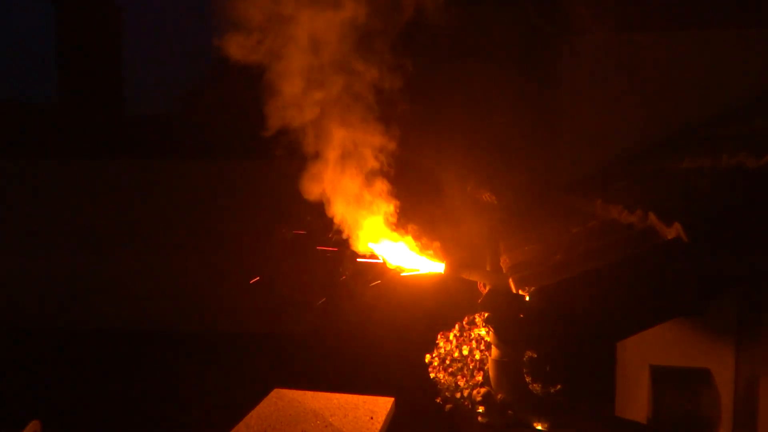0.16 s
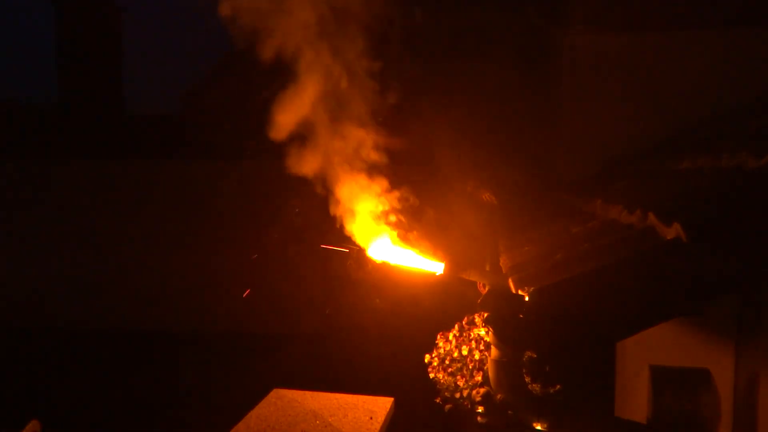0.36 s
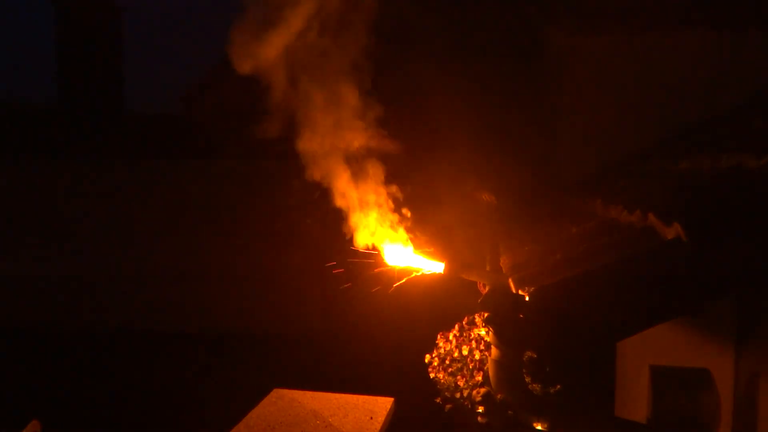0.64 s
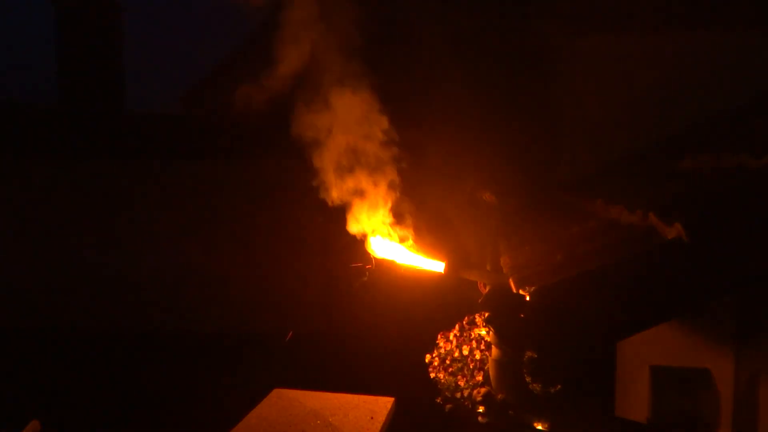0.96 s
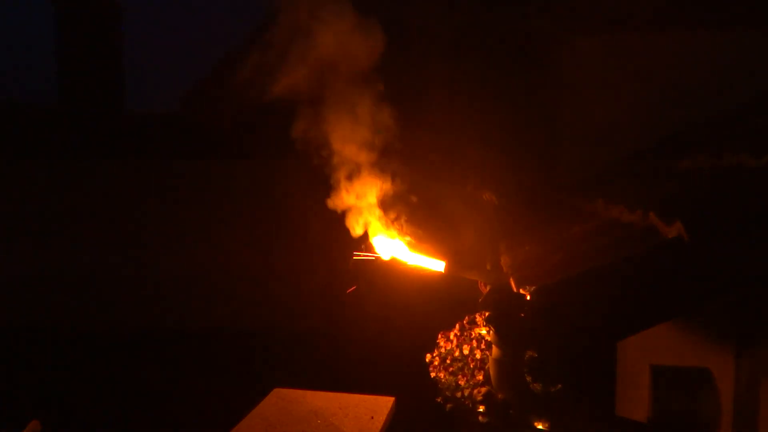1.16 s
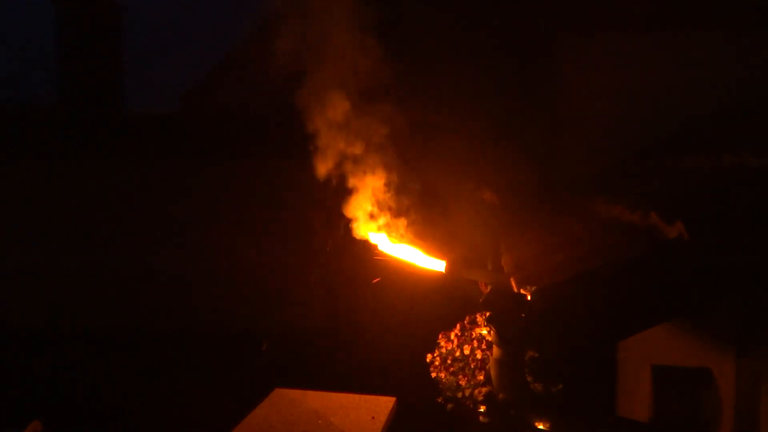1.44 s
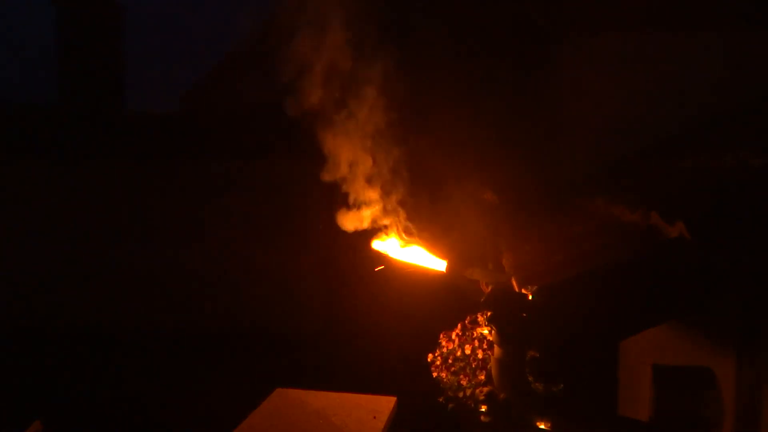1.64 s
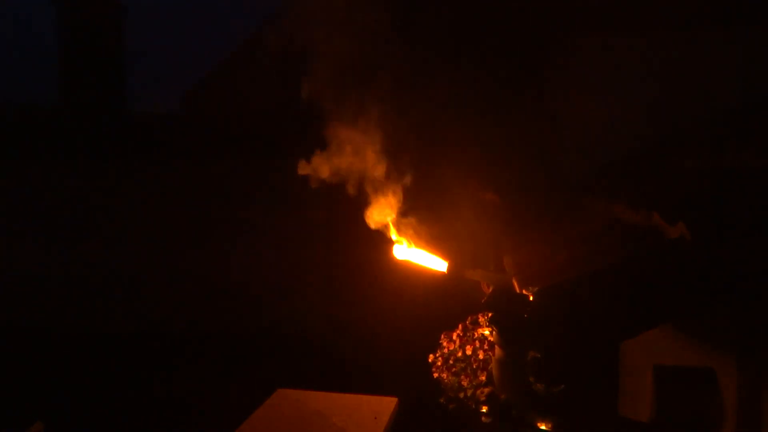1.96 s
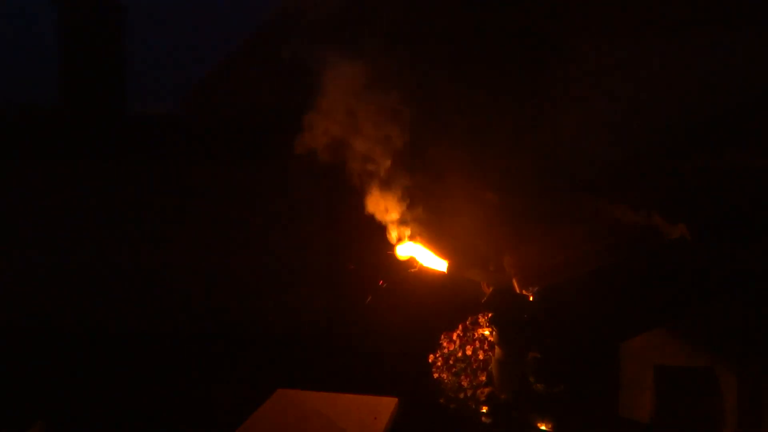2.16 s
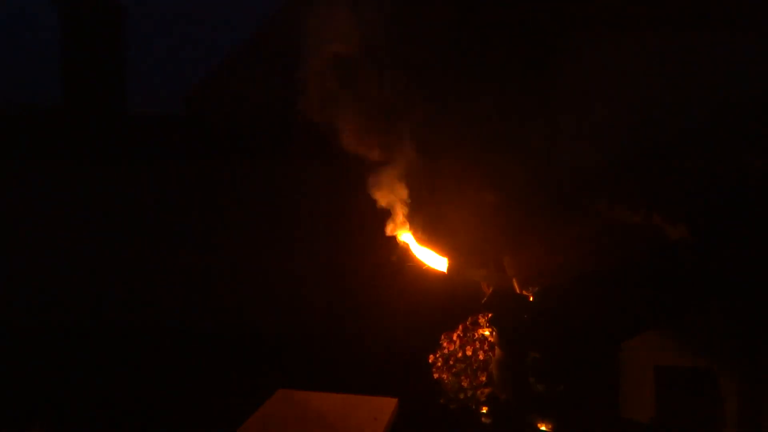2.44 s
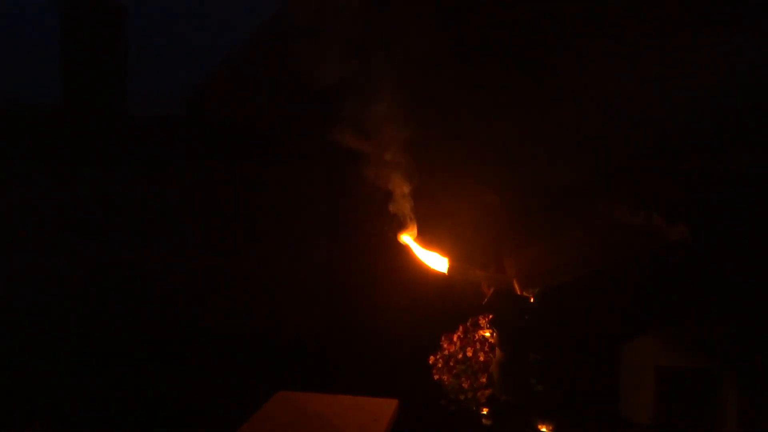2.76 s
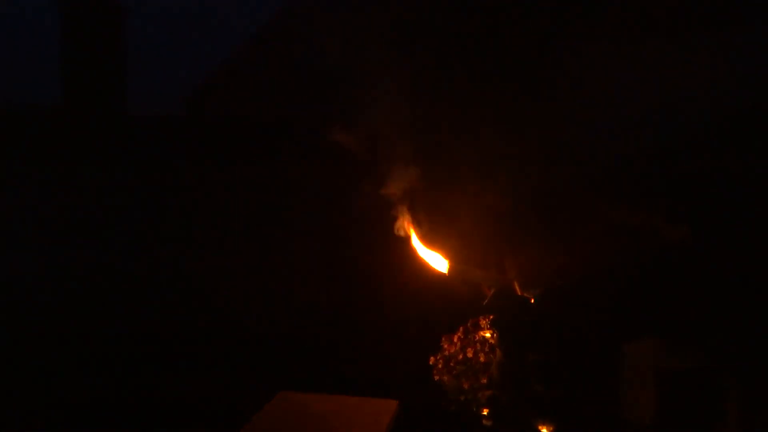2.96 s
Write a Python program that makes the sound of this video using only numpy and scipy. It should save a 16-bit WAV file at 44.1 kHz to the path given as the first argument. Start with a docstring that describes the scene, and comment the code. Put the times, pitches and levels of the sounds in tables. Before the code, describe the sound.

Loud, bright hiss and crackle of a flare outdoors, with a soft low roar beneath; after about a second it weakens, loses treble and breaks into distinct snaps with short reflections from nearby walls.

```python
"""A yard at night: a flare burns a few metres from a camera. Its flame rumbles as low filtered noise.
Thousands of grain pops, random impulses through one ring, merge into a sputtering hiss over a gas jet
of filtered noise; the loudest pops have set times. The hiss thins and loses treble as the flare dies down.
Ground and walls return the pops as four delayed copies and a short scattered tail."""
import sys
import numpy as np
from scipy import signal
from scipy.fft import rfft, irfft
from scipy.io import wavfile
from scipy.ndimage import uniform_filter1d, map_coordinates

SR = 44100
rng = np.random.default_rng(int(sys.argv[2]) if len(sys.argv) > 2 else 0)


def persist_wave(psi):
    """Save psi, clipped to +-1, as 16-bit WAV."""
    counts = np.round(np.clip(psi, -1, 1) * 32767).astype(np.int16)
    wavfile.write(sys.argv[1], SR, np.atleast_2d(counts).T)


N = 136710

DYING_DB = -24  # burning level [dB] under which the pops thin out; also where the treble gain is 0 dB


def undb(db):
    """Decibels to amplitude ratio: 20 dB is a factor of ten."""
    return 10 ** (np.asarray(db) / 20)


def unit(x):
    """Normalise to a root-mean-square amplitude of 1."""
    return x / np.sqrt(np.mean(x ** 2))


def level_over_time(table):
    """Envelope: linear interpolation in dB of a (time [s], level [dB]) table at every sample."""
    return np.interp(np.arange(N) / SR, *np.array(table).T)


def shape_db(table, size):
    """Spectral envelope: a (frequency [Hz], level [dB]) table on a log-frequency axis, at every bin."""
    table = np.array(table, float)
    hz = np.arange(size // 2 + 1) * SR / size + 1  # 1 Hz up, to keep the logarithm finite
    return np.interp(np.log(hz), np.log(table[:, 0]), table[:, 1])


def colour(x, table, rings=()):
    """Zero-phase filtering: weight the spectrum by a table plus resonance peaks (Hz, width Hz, dB)."""
    db = shape_db(table, len(x))
    hz = np.arange(len(x) // 2 + 1) * SR / len(x)
    for centre_hz, width_hz, top_db in rings:
        db = db + top_db / (1 + (2 * (hz - centre_hz) / width_hz) ** 2)
    return irfft(rfft(x) * undb(db), len(x))


def walk(rate):
    """Random modulation: held random levels, rate per second, smoothed twice by a moving mean; rms 1."""
    hold = max(int(SR / rate), 1)
    steps = np.repeat(rng.standard_normal(N // 50), hold)[:N]
    return unit(uniform_filter1d(uniform_filter1d(steps, hold), hold))


def clicks(seconds, size):
    """Impulse train: each impulse is shared by two samples, which places it between them."""
    at = np.clip(seconds * SR, 0, N - 2)
    i = at.astype(int)
    later = at - i
    return np.bincount(i, size * (1 - later), N) + np.bincount(i + 1, size * later, N)


def rumble():
    """Combustion roar: low noise with narrow resonances; it fades far less than the crackle."""
    # Spectrum of the flame's roar: (frequency [Hz], level per Hz [dB])
    roar_colour = [(15, -64), (25, -34), (102, -5.5), (130, -7.5), (167, 1), (205, -10.5), (243, -3),
                   (312, -8.5), (334, -14), (379, -9.5), (430, -28), (700, -23), (910, -67), (1540, -120)]
    # Boomy notes: (frequency [Hz], width [Hz], lift [dB])
    boomy_notes = [(101.6, 10, 4.5), (180.8, 9.4, 5.5), (230.3, 4.1, 7.5), (274, 13, 1.5)]
    # Side signal relative to mid: (frequency [Hz], level [dB])
    side_colour = [(30, -16), (70, -29), (200, -29), (400, -7.5), (800, -3)]
    # Roar over time: (time [s], level of the mid signal [dB])
    roar_levels = [(0.0, -30.5), (0.28, -30), (0.35, -33.5), (1.06, -32), (1.23, -34.5), (1.43, -31.5),
                   (1.93, -35.5), (1.96, -33.5), (2.64, -35.5), (2.71, -33), (3.03, -36), (3.1, -33.5)]
    mid, side = (colour(rng.standard_normal(N), roar_colour, boomy_notes) for _ in range(2))
    side = colour(side, side_colour)
    gain = undb(level_over_time(roar_levels))
    return gain * np.array([mid + side, mid - side]) / np.std(mid)


def yard(x):
    """Reflection and reverberation: discrete echoes, then a decaying tail that differs left and right."""
    # Ground, a box and two walls: (delay [ms], level [dB])
    echoes = [(1.75, -17), (5.08, -16), (12.0, -24), (12.74, -16)]
    # Left-right difference in the scattered sound: (frequency [Hz], level relative to the tail [dB])
    side_colour = [(300, -11), (700, 4.5), (1400, -10.5), (2000, 1.5), (3000, -9.5), (4200, -3),
                   (6500, -10.5), (8000, -36.5), (11000, -52)]
    # Balance, which leans to the right mid-range: (frequency [Hz], left minus right [dB])
    lean = [(200, -.1), (700, -.7), (1300, -.5), (3000, -.9), (5000, -.7), (6500, 0)]
    tail_db, t60_s, build_up_s = -13, 0.24, 0.008

    near = x.copy()
    for delay_ms, db in echoes:
        near += undb(db) * map_coordinates(x, [np.arange(N) - delay_ms * SR / 1000], order=1)

    t = np.arange(SR // 2) / SR
    fade = np.exp(-np.log(1000) * t / t60_s) * np.minimum(t / build_up_s, 1)  # 60 dB down after t60_s
    mid_tail, side_tail = rng.standard_normal((2, len(t))) * fade / np.sqrt(np.sum(fade ** 2))
    mid = near + undb(tail_db) * signal.fftconvolve(x, mid_tail)[:N]
    side = undb(tail_db) * colour(signal.fftconvolve(x, side_tail)[:N], side_colour)

    left = colour(mid + side, [(hz, db / 2) for hz, db in lean])
    right = colour(mid - side, [(hz, -db / 2) for hz, db in lean])
    return np.array([left, right])


def burn_db():
    """Source strength: the burning level that drives the crackle, its pop rate and its treble."""
    # Burning over time: (time [s], crackle level before the hiss filters [dB])
    burning = [(0, -23.5), (.7, -23.5), (1.08, -23.5), (1.2, -25.5), (1.54, -24.5), (1.72, -28),
               (1.96, -28), (2.03, -32), (2.2, -31), (2.29, -28), (2.4, -33), (2.46, -31.5), (2.58, -33),
               (2.66, -36.5), (2.74, -35), (2.81, -33), (2.9, -36), (2.96, -35.5), (2.99, -41), (3.02, -35),
               (3.1, -39)]
    return level_over_time(burning)


def gas_jet(sputter_db):
    """Jet noise: turbulent outflow as coloured noise that follows part of the sputter."""
    # Spectrum of the jet: (frequency [Hz], level per Hz [dB])
    jet_colour = [(300, -13.5), (440, -13), (605, -8.5), (874, -12), (958, -4.5), (1120, -7.5), (1280, -4),
                  (1520, 0), (2000, -10.5), (3000, -7.5), (4440, -7.5), (4940, -14), (8000, -14.5),
                  (13000, -22), (16000, -18.5)]
    # Jet over time: (time [s], level before the hiss filters [dB])
    jet_levels = [(0, -27), (.1, -26.5), (.47, -28), (1.1, -28), (1.55, -28), (1.94, -29.5), (2.05, -30),
                  (2.3, -33), (2.58, -33.5), (2.67, -38), (2.78, -34), (2.99, -37.5), (3.1, -36.5)]
    sputter_share = 0.71  # dB per dB of sputter
    noise = unit(colour(rng.standard_normal(N), jet_colour))
    return noise * undb(level_over_time(jet_levels) + sputter_share * sputter_db)


def pop_ring():
    """Impulse response: a minimum-phase ring through an all-pass, opened by a short dip; peak 1."""
    # A pop through the tube mouth and the camera body: (frequency [Hz], level per Hz [dB])
    pop_colour = [(300, -21.5), (500, -23), (900, -18), (1190, -8.5), (1520, -5), (2000, -10.5), (2560, -5),
                  (2840, -2), (3120, -4), (4440, -0.5), (4940, -8.5), (5670, -6.5), (6220, -10.5),
                  (7820, -4.5), (8580, -8), (12200, -2.5), (16000, -18)]
    size, floor_db = 4096, -45
    suction = 0.8  # strength of the opening dip
    # Folding the cepstrum onto positive times makes the response causal and minimum-phase
    cepstrum = irfft(np.log(undb(np.maximum(shape_db(pop_colour, size), floor_db))), size)
    cepstrum[1:size // 2] *= 2
    cepstrum[size // 2:] = 0
    ring = irfft(np.exp(rfft(cepstrum)), size)[:size // 4]
    # The three-sample all-pass sends an inverted copy ahead of the pop
    ring = signal.lfilter([-suction, 0, 0, 1], [1, 0, 0, -suction], ring)
    return ring / np.abs(ring).max()


def crackle(db, sputter_db, ring):
    """Shot noise: random grain bursts that grow rarer and stand out more as the burning level falls."""
    pops_per_s, thin_per_db = 3500, 0.06  # full rate; fall of log rate per dB under DYING_DB
    growth = 0.5  # exponent by which rarer pops gain amplitude
    scatter_db, loudest_db = 6, 13  # exponential scale and cap, over the smallest pop
    rate = pops_per_s * np.exp(thin_per_db * np.minimum(db - DYING_DB, 0))
    fires, size_draw, offset = rng.random((N, 3)).T
    i = np.flatnonzero(fires < rate / SR)
    size_db = np.minimum(-scatter_db * np.log(1 - size_draw[i]), loudest_db)
    size = undb(size_db) * (pops_per_s / rate[i]) ** growth
    impulses = unit(clicks((i + offset[i]) / SR, size)) * undb(db + sputter_db)
    return signal.fftconvolve(impulses, ring)[:N] / np.sqrt(np.sum(ring ** 2))


def loud_pops(ring):
    """Linear superposition: the loudest single pops, each a scaled copy of the ring."""
    # Loudest pops: (time [s], peak before the treble filter [dB])
    pops = [(0.042, -4), (0.0557, -1), (0.0964, -4), (0.1012, -2), (0.1063, -4), (0.1201, -3), (0.1353, -3),
            (0.1533, 0), (0.1744, -4), (0.1873, -3), (0.19, -4), (0.2063, -4), (0.2329, -3), (0.2557, -3),
            (0.3992, -4), (0.4419, -3), (0.4618, -3), (0.5167, -4), (0.6196, -4), (0.6312, -3),
            (0.6336, -4), (0.7442, -2), (0.7541, -1), (0.7664, -4), (0.8175, -3), (0.8267, -4),
            (0.9079, -3), (0.9654, -5), (0.992, -3), (1.0071, -4), (1.0118, -5), (1.0176, -4), (1.0306, -2),
            (1.0903, -4), (1.0997, -5), (1.2239, -5), (1.2738, -6), (1.2898, -5), (1.2967, -6),
            (1.3012, -5), (1.371, -5), (1.3874, -5), (1.4725, -5), (1.4775, -7), (1.4829, -4), (1.5347, -3),
            (1.5482, -6), (1.6428, -6), (1.657, -5), (1.6789, -8), (1.7066, -2), (1.7148, -8), (1.72, -8),
            (1.7248, -7), (1.7293, -7), (1.742, -5), (1.7744, -8), (1.7858, -8), (1.8102, -4), (1.815, -6),
            (1.8636, -8), (1.8912, -5), (1.8938, -9), (1.8956, -8), (1.8969, -9), (1.9043, -6),
            (1.9365, -9), (1.9384, -9), (1.9532, -9), (1.9563, -8), (1.9803, -7), (1.9854, -4),
            (1.9981, -8), (2.0165, -8), (2.0398, -6), (2.0531, -4), (2.0545, -8), (2.0578, -8),
            (2.0744, -8), (2.084, -6), (2.088, -8), (2.093, -9), (2.0974, -1), (2.1138, -7), (2.1182, -9),
            (2.1353, -9), (2.1518, -9), (2.1596, -8), (2.1621, -8), (2.18, -3), (2.1928, -9), (2.2017, -8),
            (2.206, -6), (2.2207, -7), (2.2234, -7), (2.2325, -8), (2.2372, -7), (2.2434, 2), (2.252, -3),
            (2.2534, -10), (2.2706, -7), (2.2809, -8), (2.2859, -10), (2.2966, -8), (2.3043, -8),
            (2.3085, -5), (2.3131, -9), (2.315, -8), (2.3244, -9), (2.3261, -10), (2.3406, -9),
            (2.3461, -2), (2.3519, -4), (2.3565, -10), (2.358, -5), (2.3674, -9), (2.3872, -8),
            (2.3893, -7), (2.402, -8), (2.4207, -9), (2.4236, -3), (2.4368, -8), (2.4431, -6), (2.445, -9),
            (2.4517, -9), (2.4574, -8), (2.4588, -11), (2.4856, -11), (2.4902, -3), (2.4991, -11),
            (2.5074, -10), (2.5089, -10), (2.5132, -10), (2.5195, -2), (2.5301, -11), (2.5489, -8),
            (2.5541, -10), (2.5635, -8), (2.5694, -2), (2.5756, -12), (2.5768, -12), (2.5785, -10),
            (2.592, -10), (2.601, -10), (2.6039, -10), (2.6184, -7), (2.6304, -8), (2.6687, -13),
            (2.694, -10), (2.7107, -11), (2.7156, -8), (2.7234, -10), (2.7448, -8), (2.7509, -7),
            (2.7559, -8), (2.7575, -13), (2.7601, -9), (2.7645, -9), (2.7661, -7), (2.7778, -8),
            (2.7806, -6), (2.7868, -5), (2.7907, -9), (2.792, -7), (2.801, -10), (2.8244, -2), (2.8322, -8),
            (2.8375, -8), (2.8418, -8), (2.8437, -10), (2.8477, -11), (2.8547, -9), (2.8607, -8),
            (2.8731, -13), (2.8775, -2), (2.89, -10), (2.8986, -13), (2.9056, -7), (2.9213, -4),
            (2.9298, -7), (2.933, -11), (2.9366, -12), (2.9448, -2), (2.951, -12), (2.9637, -11),
            (3.001, -3), (3.0153, -11), (3.0269, -11), (3.0319, -13), (3.0338, -8), (3.0574, -5),
            (3.0596, -3), (3.0648, -13), (3.0846, -11), (3.095, -13)]
    seconds, peak_db = np.array(pops).T
    return signal.fftconvolve(clicks(seconds, undb(peak_db)), ring)[:N]


def fade_treble(hiss, db):
    """Band splitting: the treble falls faster than the rest, with the burning level averaged over time."""
    split_hz, follows, average_s = 8400, 0.41, 0.3  # follows: treble dB per dB of burning
    low = signal.sosfiltfilt(signal.butter(2, split_hz, fs=SR, output="sos"), hiss)
    slow_db = uniform_filter1d(db, int(average_s * SR))
    return low + (hiss - low) * undb(follows * (slow_db - DYING_DB))


def flare():
    """Superposed sources: crackle and jet share one sputter and resonances; the loud pops join them."""
    # Narrow resonances in the hiss: (frequency [Hz], width [Hz], lift [dB])
    hiss_rings = [(1193, 30, 7), (1420, 30, 4), (1482, 30, 5), (1550, 70, 4), (1669, 30, 3), (1742, 30, 6),
                  (1820, 40, 4), (1905, 30, 5), (2165, 40, 4), (2355, 40, 3), (4487, 60, 2)]
    db, ring = burn_db(), pop_ring()
    sputter_db = 1.5 * walk(100)  # 1.5 dB rms, 100 random levels per second
    hiss = crackle(db, sputter_db, ring) + gas_jet(sputter_db)
    hiss = colour(hiss, [(1000, 0.03)], hiss_rings)  # one point: a flat 0.03 dB under the peaks
    return fade_treble(loud_pops(ring) + hiss, db)


def scene():
    """Superposition at the listening point: the flare with its reflections, over the flame's rumble."""
    return yard(flare()) + rumble()


def record(dry):
    """Band limiting and soft saturation: the camera cuts deep bass and top and rounds the loudest pops."""
    # The microphone loses the top: (frequency [Hz], level [dB])
    microphone = [(13500, 0), (14400, -1), (14650, -6), (15700, -8)]
    low_cut_hz, top_hz = 46, 15740
    x = [colour(channel, microphone) for channel in dry]
    x = signal.sosfilt(signal.butter(2, low_cut_hz, "high", fs=SR, output="sos"), x)
    rounded = x / (1 + x ** 4) ** .25  # stays within -1 to 1
    return signal.sosfilt(signal.ellip(12, .3, 70, top_hz, fs=SR, output="sos"), rounded)


dry = scene()
out = record(dry)
persist_wave(out)
```